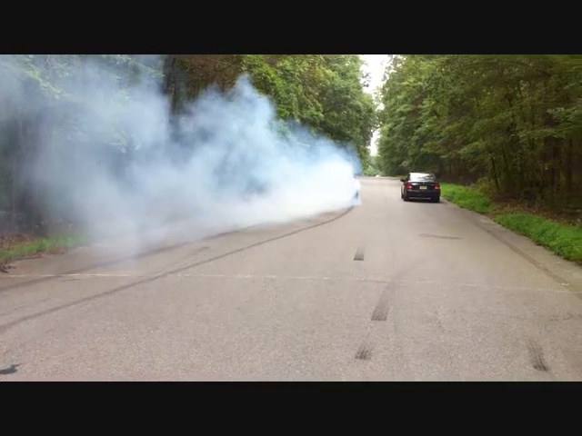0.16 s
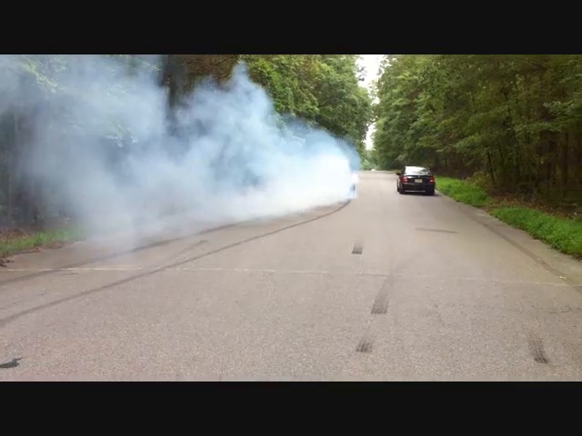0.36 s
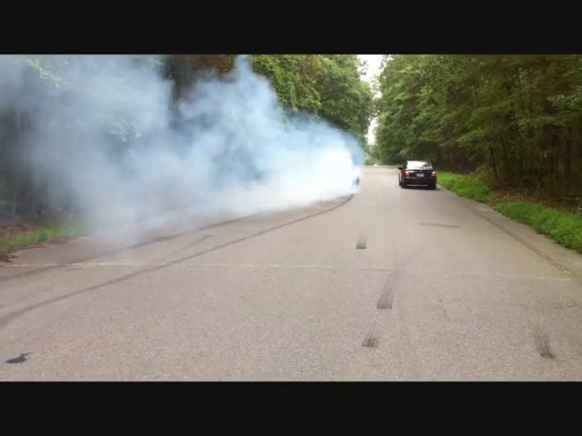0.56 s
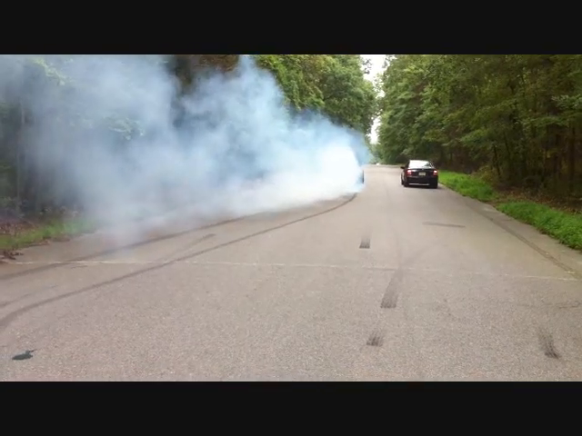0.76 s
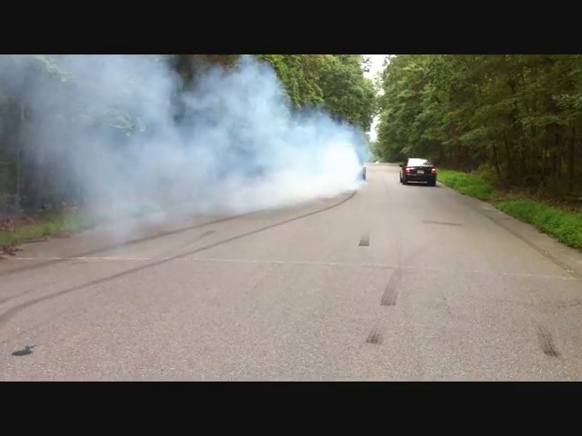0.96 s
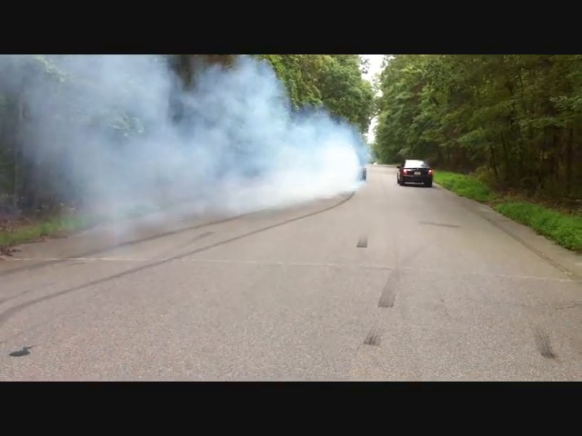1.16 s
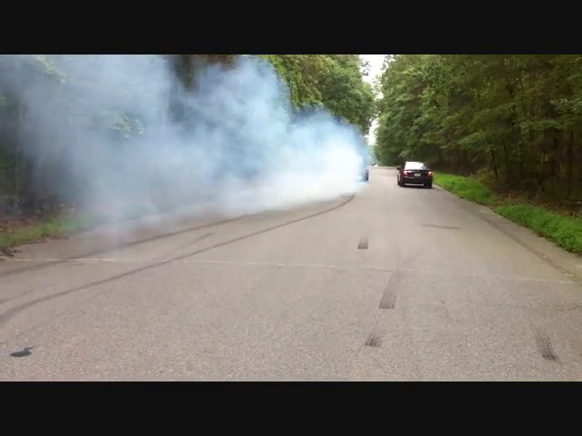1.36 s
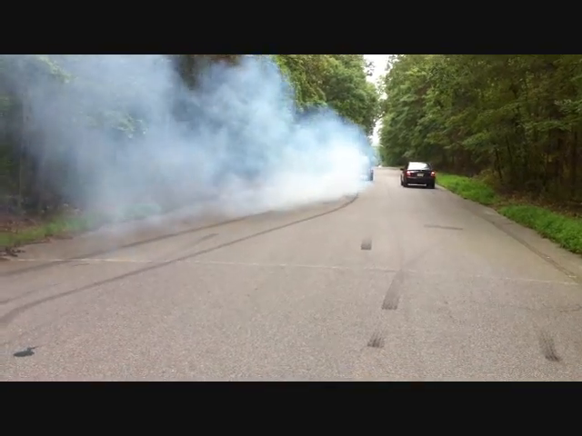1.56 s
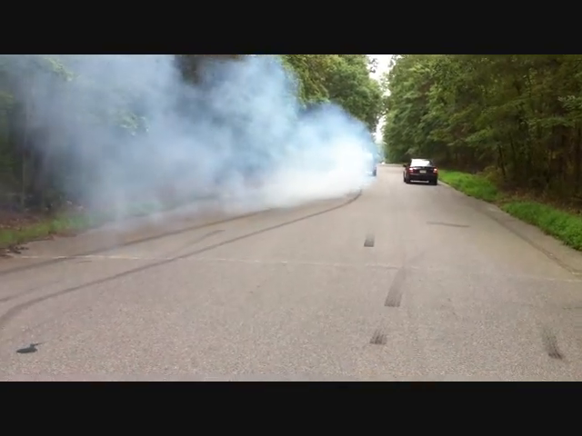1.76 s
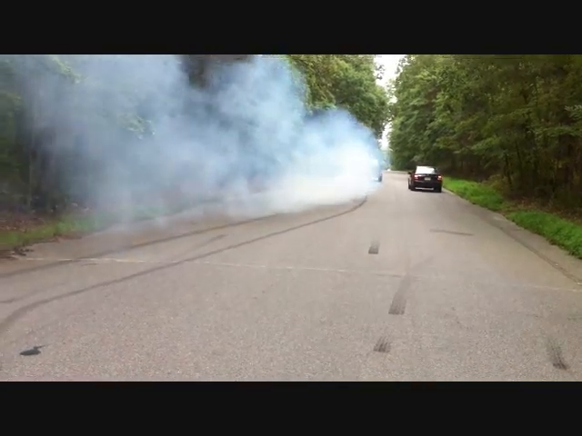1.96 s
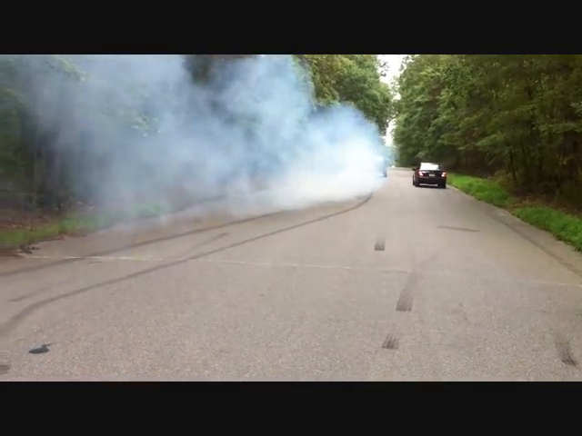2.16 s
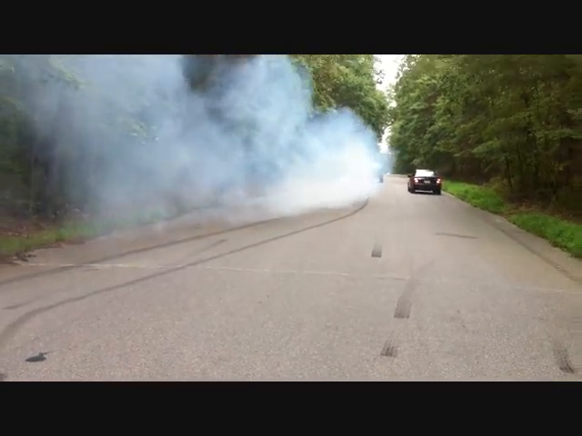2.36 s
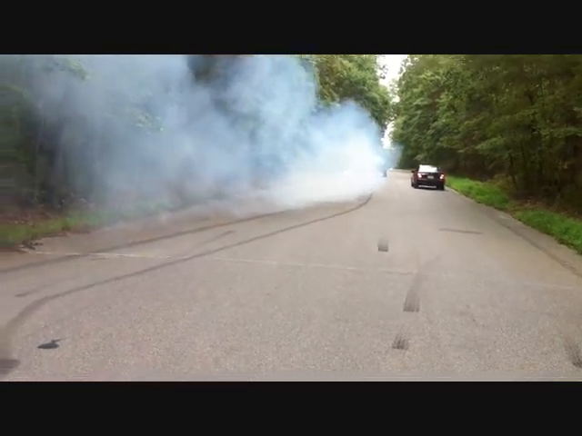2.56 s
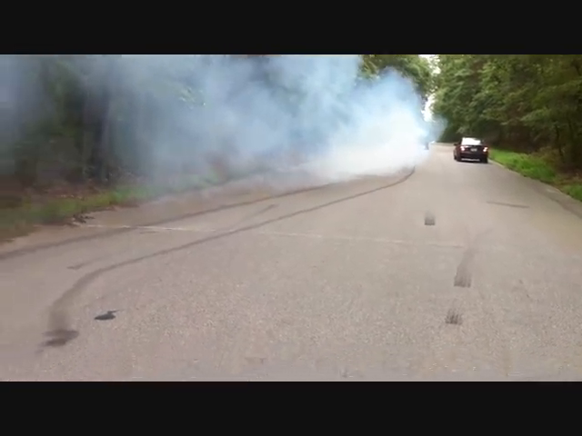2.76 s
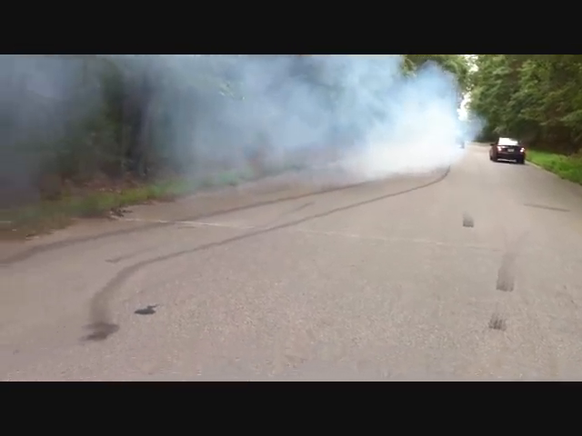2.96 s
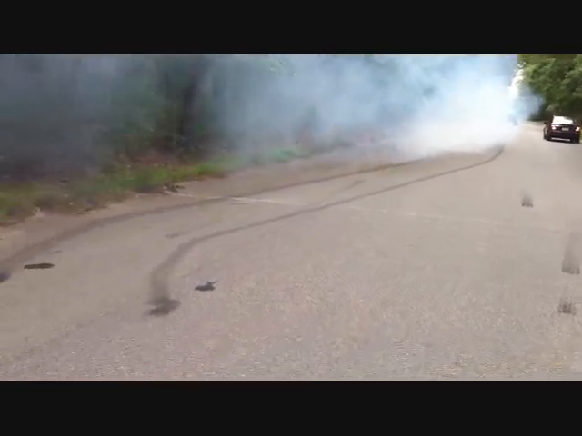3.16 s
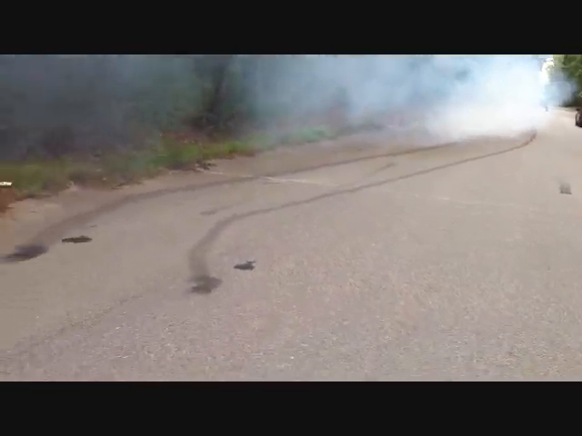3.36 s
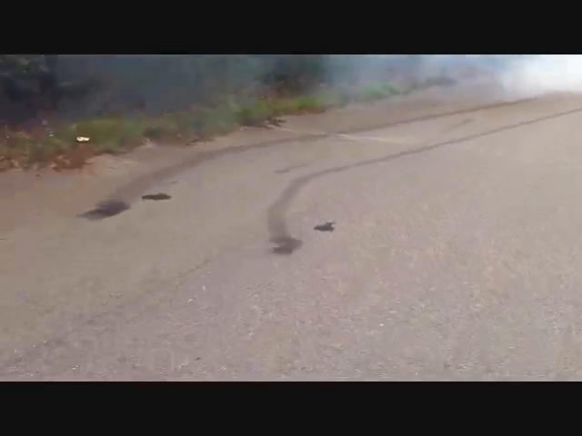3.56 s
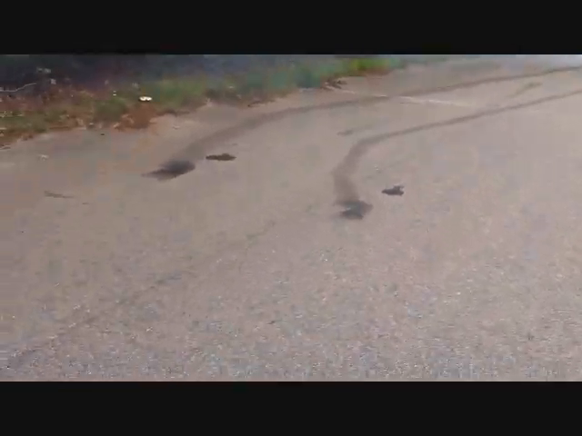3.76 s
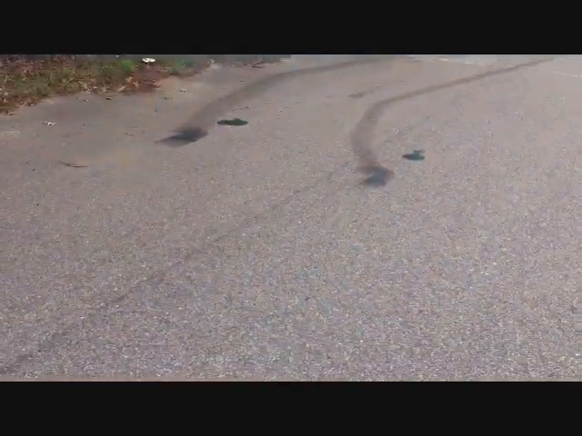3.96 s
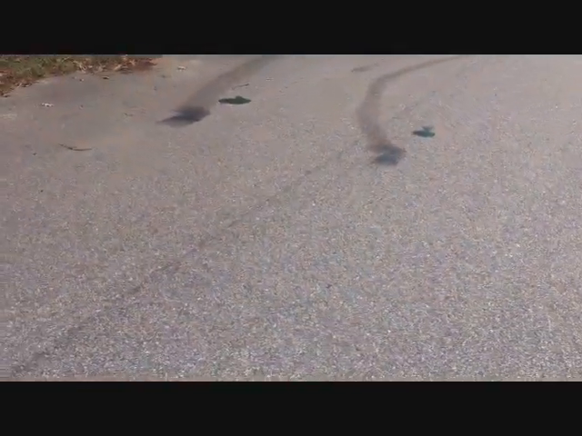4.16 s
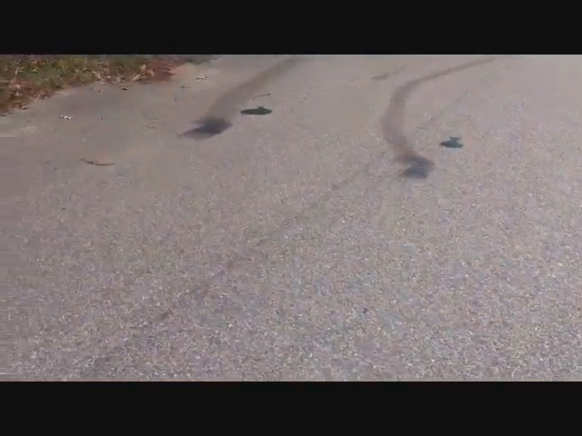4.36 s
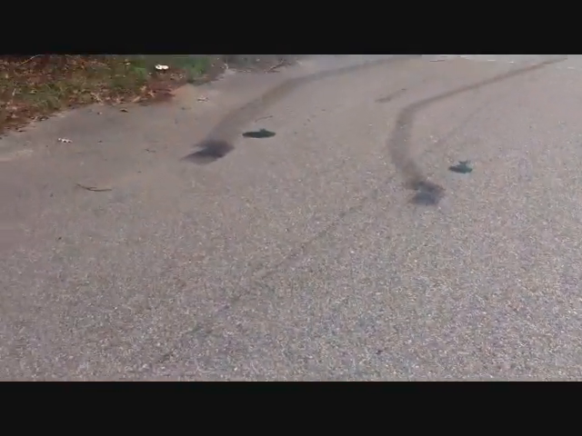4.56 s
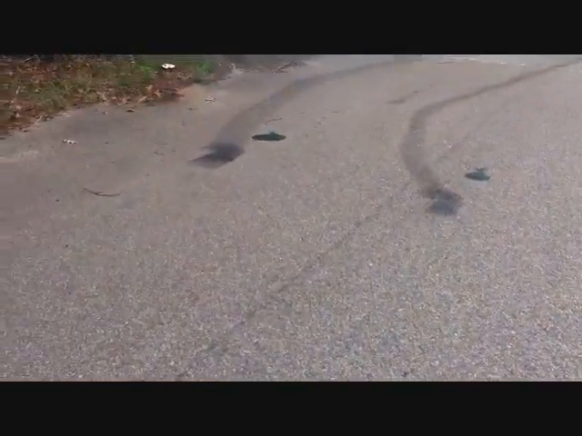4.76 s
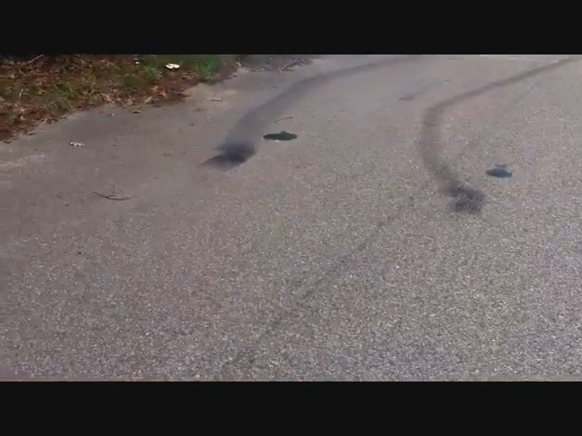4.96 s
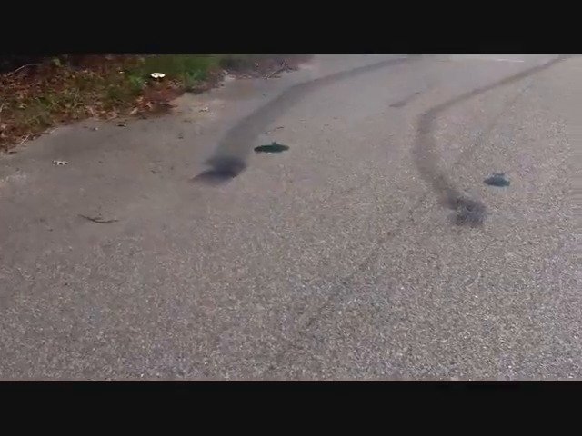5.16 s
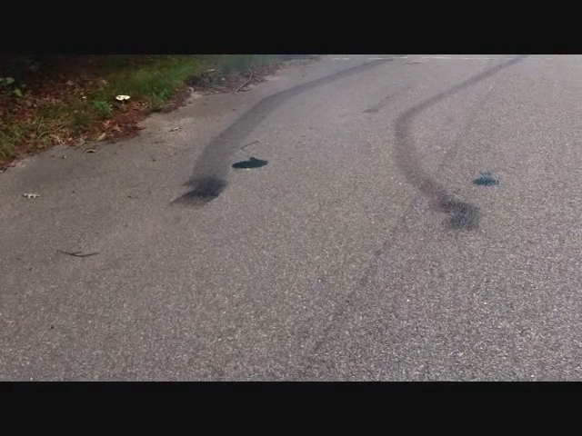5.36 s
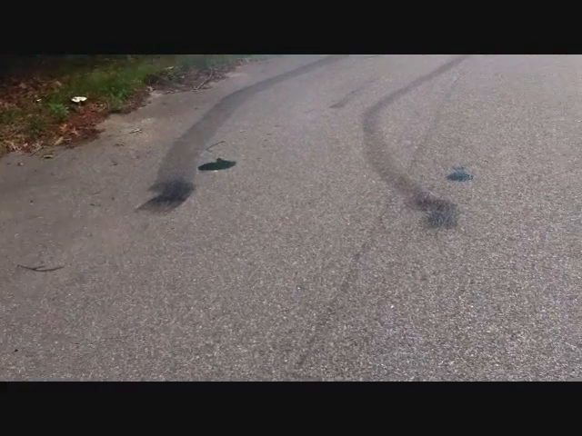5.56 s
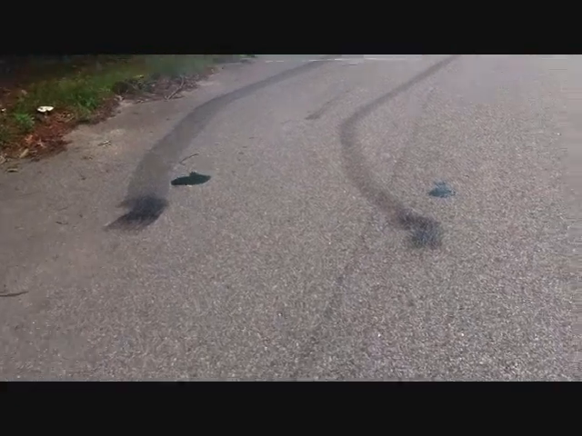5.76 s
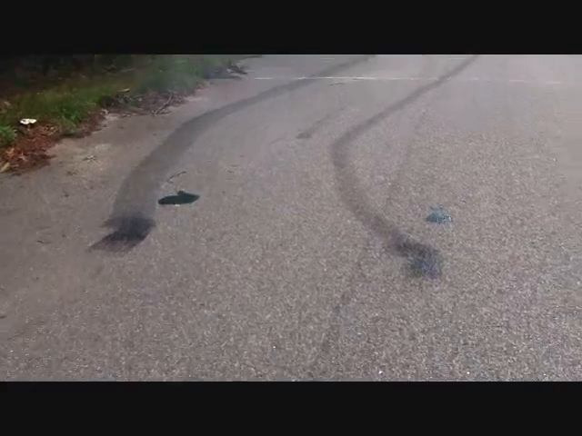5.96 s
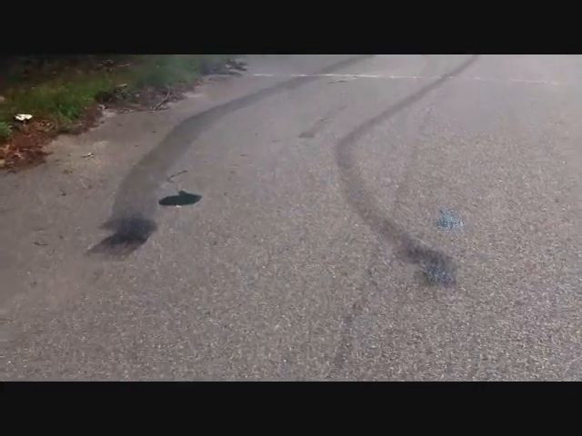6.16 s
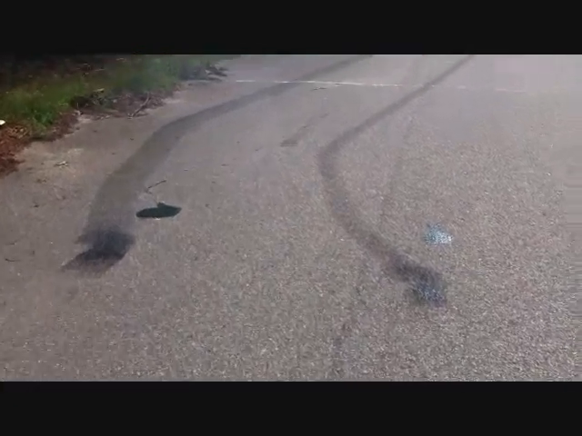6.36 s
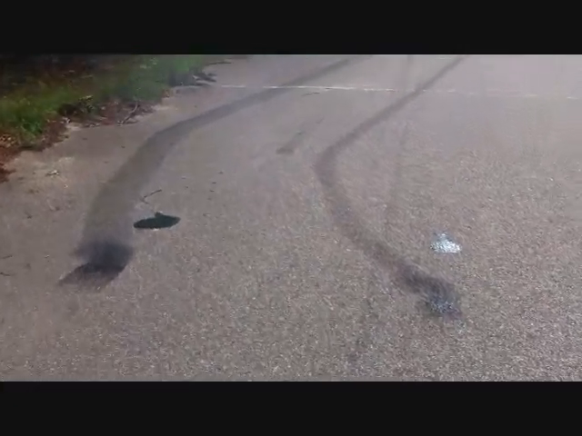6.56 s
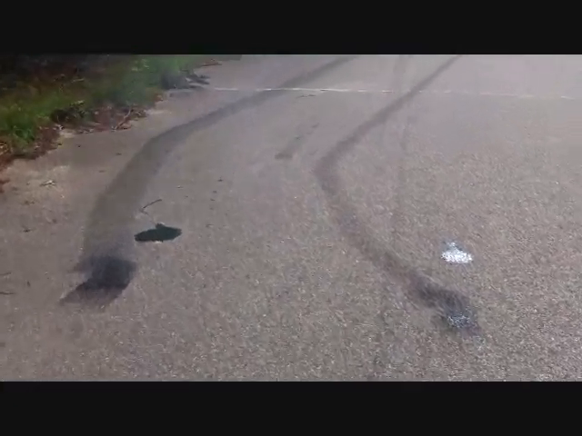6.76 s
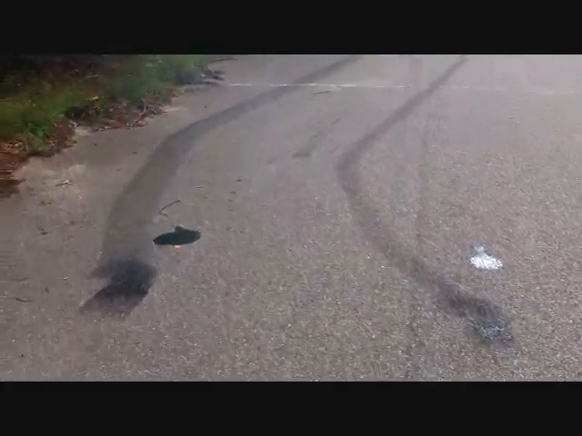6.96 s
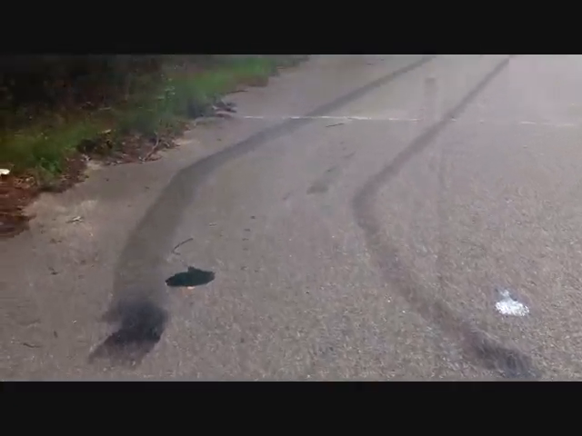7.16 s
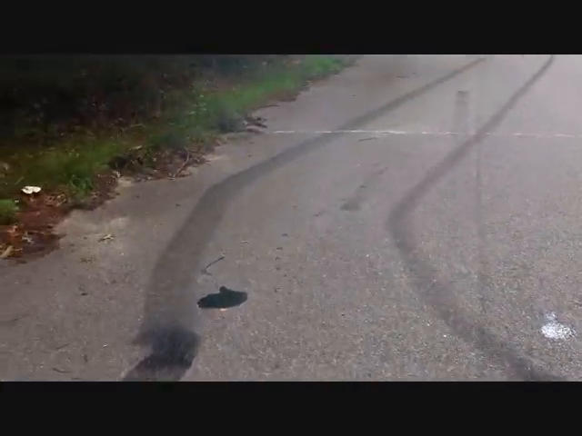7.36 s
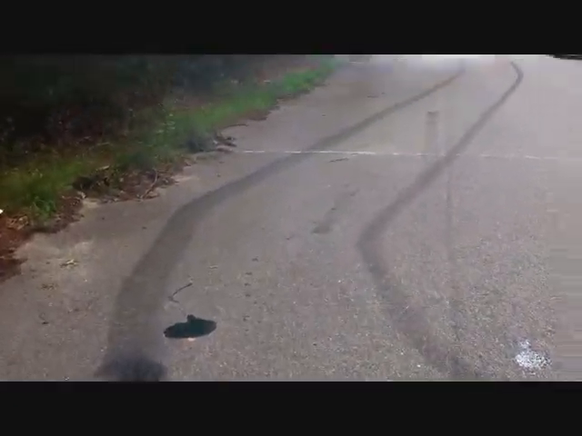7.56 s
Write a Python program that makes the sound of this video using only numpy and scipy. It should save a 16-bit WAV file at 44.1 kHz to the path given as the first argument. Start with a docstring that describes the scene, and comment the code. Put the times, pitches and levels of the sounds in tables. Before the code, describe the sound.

From the start, a car engine drones loudly at high revs while spinning tyres squeal in ragged bursts and hiss against the asphalt. The trees along the road add a short, dull echo. The squeal weakens and dies away soon after 1 second. The engine sags in pitch until about 1.8 seconds, then climbs a little as the hiss fades. Near 2.5 seconds the exhaust cracks, the throttle shuts at 2.7, and a quick cluster of coughs and thumps follows around 3 seconds. The engine booms and falls steadily in pitch, settling by 5 seconds into a quiet, lumpy idle. From about 4 seconds, very faint thin bird whistles, a high insect trill and soft nearby rustles come through. The idle throbs on with a few tiny exhaust pops around 7 seconds, fading toward the end at about 7.7 seconds.

```python
"""A six-cylinder car ends a burnout down a wooded road. Its firings drone through the exhaust at high
revs while the spinning tyres stick and slip, squealing and scouring the asphalt. The throttle shuts;
the exhaust coughs and booms down through its resonances to a lumpy idle. Trees scatter the sound.
Insects, a thin-voiced bird and faint rustling come through as it quietens."""
import sys
import numpy as np
from scipy import signal
from scipy.fft import rfft, irfft
from scipy.io import wavfile
from scipy.ndimage import uniform_filter1d

SR = 44100
rng = np.random.default_rng(int(sys.argv[2]) if len(sys.argv) > 2 else 0)


def materialize(psi):
    """Save the field psi as 16-bit PCM at rate SR to the path in sys.argv[1].

    A 1-D psi becomes a single channel; in a 2-D psi each row is a channel.
    """
    bounded = np.clip(np.atleast_2d(psi).T, -1, 1)
    quanta = np.round(bounded * 32767).astype(np.int16)
    wavfile.write(sys.argv[1], SR, quanta)


N = 339570
T = np.arange(N) / SR

# Engine speed. Each row: time in seconds, firing rate in Hz.
FIRING_RATE = [(0, 246.3), (.8, 227.5), (1.76, 191.7), (2.05, 206), (2.6, 219.5), (2.74, 216.1),
               (2.81, 202.5), (2.93, 198.8), (3.0, 189.4), (3.28, 166.5), (3.72, 130.4), (3.85, 121.1),
               (4.25, 94.1), (4.9, 59.03), (5.15, 48.7), (5.45, 50.9), (5.78, 44.72), (6.15, 54.05),
               (6.62, 56.4), (6.88, 54.56), (7.15, 49.54), (7.4, 47.36), (7.7, 46.03)]
# Each entry: one cylinder's strength in dB, in firing order.
CYLINDER_DB = [-8.5, -4.5, -3.5, -4.5, -4, -10.5]
# Drone tones. Each row: multiple of crank rate, open-throttle gain in dB, shut-throttle gain in dB.
DRONE_ORDERS = [(3, -6.5, 2), (4, -10, -16), (4.5, -12, -8), (6, -10, -8.5), (8, -20.5, -15),
                (9, -11.5, -12.5), (12, -32, -23)]
# Pipe and silencer resonances. Each row: frequency in Hz, drone gain in dB.
EXHAUST_RESPONSE = [(80, -43), (105, -14), (120, -10), (132, -7.5), (150, 2), (172, 0), (192, 2.5),
                    (203, -3.5), (215, -7), (235, -16), (260, -9), (320, -30.5), (400, -10), (440, -16.5),
                    (490, -7.5), (580, 4.5), (620, -3), (680, 2.5), (750, -13)]
# Idle hum. Each row: multiple of firing rate, gain in dB.
HUM_ORDERS = [(2, -5), (3, 2), (4, .5), (5, 3), (6, 2.5), (7, -3), (8, -2), (9, -2), (10, -5), (11, -4)]
# Gas rasp envelope. Each row: time in seconds, level in dB.
GAS_LEVEL = [(0.0, -27.5), (0.36, -29.5), (0.8, -32.5), (1.52, -37.5), (2.44, -36.5), (2.55, -34),
             (2.64, -37), (3.15, -40), (4.5, -49), (4.95, -48), (5.15, -48.5), (6.05, -57), (7.66, -64.5),
             (7.7, -61)]
# Exhaust coughs. Each row: time in seconds, width in seconds, thump in dB, crack in dB,
# share of drone lost.
EXHAUST_COUGHS = [(2.549, 0.0034, -48, -23.5, 0), (2.56, 0.005, -53, -28, 0), (2.771, 0.0041, -48, -38, 0),
                  (2.81, 0.0073, -31, -30, 0), (2.943, 0.0098, -23, -28.5, 1),
                  (2.964, 0.0078, -31, -29, 0.5), (3.012, 0.03, -28.5, -39, 0.43),
                  (6.799, .003, -52, -46, 0), (7.198, 0.0049, -57, -45, 0), (7.241, .003, -54, -47, 0),
                  (7.319, 0.0025, -58, -43, 0), (7.574, .003, -48, -47, 0)]
# Tread vibrations. Each row: nominal pitch in Hz, scatter as a share of pitch, gain in dB.
TREAD_MODES = [(491.7, 0.0302, -17.5), (572.3, .035, -10), (662, 0.0448, -5), (763.4, .04, -5),
               (849, .036, -2), (1018, .05, 0.5), (1118, 0.0406, -20), (1248, .03, -19)]
# Tread bites. Each row: centre in seconds, half-width in seconds, nominal pitch in Hz, level in dB,
# relative overtone level in dB.
TREAD_BITES = [(0.019, 0.01, 940, -14.5, -11), (0.048, 0.0047, 964.4, -18, -18),
               (0.057, 0.0049, 921.5, -9, -9.5), (0.091, 0.0053, 976, -15.5, -16),
               (.113, 0.0042, 960.5, -17.5, -19), (0.163, 0.0089, 928.6, -13, -14.5),
               (0.197, 0.0047, 1076, -13.5, -24), (.209, 0.0052, 932.6, -20, -3),
               (0.246, 0.0052, 950.6, -11.5, -24), (.27, 0.0045, 944, -11.5, -11.5),
               (.315, 0.0055, 916, -10, -12), (0.346, 0.0084, 947, -11.5, -23),
               (.372, 0.0081, 930.6, -17, -16), (0.404, 0.0037, 894.2, -17, -20),
               (0.429, 0.0048, 1014, -17, -22), (.449, 0.0039, 934, -15, -22),
               (.476, 0.004, 898, -14.5, -14), (0.502, 0.0079, 915, -15.5, -12),
               (0.573, 0.016, 937, -16, -15), (0.622, .005, 875.6, -18, -10),
               (0.658, 0.012, 960.6, -16, -20), (0.706, 0.0048, 952, -21.5, -16.5),
               (0.73, 0.0043, 945, -22.5, -25), (0.769, 0.0058, 896, -17, -14), (0.81, .014, 955, -23, -10),
               (0.849, 0.0058, 943, -20, -18), (0.881, 0.0052, 897.6, -20.5, -27),
               (0.995, 0.0057, 921, -21.5, -20), (1.025, .006, 826, -21, -20.5),
               (1.105, 0.0081, 934, -24, -13)]
# Whistles. Each row: start in seconds, length in seconds, start pitch in Hz, end pitch in Hz, level in dB.
BIRD_NOTES = [(3.995, .055, 7040, 5650, -53), (4.035, .15, 5900, 5900, -62.5),
              (4.083, .045, 7550, 7300, -64), (4.125, .055, 7560, 7400, -58), (4.19, .08, 6800, 6760, -61),
              (5.478, .05, 6115, 5830, -58), (5.558, .067, 7520, 7280, -67), (5.64, .23, 6980, 6900, -69),
              (6.411, 0.1201, 7200, 6850, -68), (7.402, .028, 6450, 6120, -58),
              (7.416, 0.029, 5930, 5230, -60), (7.44, 0.072, 6230, 6160, -61),
              (7.668, 0.019, 5720, 5180, -61)]
# Swells of the lower insect. Each row: centre in seconds, half-width in seconds, level in dB.
RATTLE_SWELLS = [(3.3, 0.68, -64), (5.242, 0.24, -66), (6.3, 0.34, -72)]
# Nearby rustles. Each row: centre in seconds, half-width in seconds, rustle in dB, brush in dB.
RUSTLE_SWELLS = [(4.019, 0.38, -56.5, -65), (4.87, 0.0082, -70, -66), (4.9, .2, -66, -82),
                 (5.25, 0.22, -60, -79), (6.15, 0.29, -58, -63.5), (7.288, .015, -63, -64)]
# Spectra. Each row: frequency in Hz, relative level in dB.
PIPE_SPECTRUM = [(25, -76), (60, -31), (100, -13), (150, -4.5), (220, -1.5), (280, 0.5), (340, -1),
                 (400, -12.5), (520, -0.5), (590, -0.5), (700, -35), (900, -24.5), (2000, -43), (5000, -60),
                 (12000, -75)]
RUMBLE_SPECTRUM = [(25, -43), (60, -32), (90, -5.5), (140, 3.5), (180, 8.5), (240, 3), (400, -5.5),
                   (900, -35.5)]
RASP_SPECTRUM = [(200, -33), (420, -1.5), (750, 5), (900, -1), (1120, 6), (1280, 2), (1390, 1), (1520, 2.5),
                 (1850, .5), (2090, -6), (2250, -1.5), (2430, -1.5), (2620, -19), (2800, -15.5),
                 (4200, -14.5), (8000, -46)]
COAST_SPECTRUM = [(200, -11), (450, -1), (700, -1), (900, 9.5), (1080, 9), (1270, 3.5), (1500, 6.5),
                  (1800, -4), (2100, -1.5), (2350, -7.5), (2800, -10), (3400, -12), (4100, -15),
                  (4900, -25), (8000, -43)]
SCOUR_SPECTRUM = [(900, -12), (2300, 6.5), (3200, 1), (3700, 1.5), (4350, 4), (5100, 1.5), (6300, 4.5),
                  (7400, 1), (8700, 3), (9700, 0.5), (11300, -0.5), (12500, -4.5), (14000, -7.5),
                  (15500, -15)]
LEAF_SPECTRUM = [(900, -11), (2300, 9.5), (3200, 2), (3700, 1.5), (4200, 4.5), (4900, 0.5), (5600, 0.5),
                 (6300, 0.5), (7300, -0.5), (8700, 2), (11300, 0.5), (12500, -6), (14000, -4), (15500, -9)]
AIR_SPECTRUM = [(25, -18), (70, -16), (200, 21), (600, 25), (1500, 17.5), (3000, 11.5), (4800, 6.5),
                (6000, 7), (7300, -10), (9500, -6), (12000, -10), (15500, 0)]

THROTTLE_SHUT_S, IDLE_FADE_S = 2.7, 7.08
GRIP_END_S, SCREECH_END_S, SPIN_EASE_S, SPIN_END_S = 1.004, 1.05, 2.25, 2.69
FIRINGS_PER_TURN = 3


def engine():
    """Firings drone at speed and thud at idle; a gas puff follows each."""
    firing_hz, = curves(FIRING_RATE)
    cycle = np.cumsum(firing_hz * (1 + .002828 * walk(40))) / SR
    throttle = 1 - ramp(THROTTLE_SHUT_S, length_s=.085)
    idle = np.clip((62 - firing_hz) / 8, 0, 1)
    fade = undb(-14 * after(IDLE_FADE_S))
    puff = unit(.5 + np.exp(-(cycle % 1) / 1.16))

    def gain(open_db, shut_db, idle_db):
        return undb(shut_db + throttle * (open_db - shut_db) + idle * (idle_db - shut_db))

    rumble = gain(-46.5, -45.5, -51) * colour(noise() * puff, RUMBLE_SPECTRUM)
    thuds = gain(-59.5, -49.5, -49.5) * firing_thuds(firing_hz, cycle)
    wash = gain(-42, -53.5, -51) * colour(noise() * puff, PIPE_SPECTRUM)
    hum = fade * idle * idle_hum(cycle)
    gas = gas_flow(firing_hz, puff, bark_gain=gain(-3, 0, -1))
    tones = (1 - idle) * drone(firing_hz, cycle, throttle) + hum
    return tones + woods(fade * (rumble + thuds + wash) + gas, wet_db=-11.5)


def drone(firing_hz, cycle, throttle):
    """Orders of two unequal banks sweep the exhaust resonances and stumble at the big coughs."""
    pipe_hz, pipe_db = np.transpose(EXHAUST_RESPONSE)
    speed_db = -26 + 11 * np.log2(firing_hz / 205)
    # The growl dies as the melting tyres take less torque.
    tones = throttle * engine_tone(2 * cycle / FIRINGS_PER_TURN, -35.5 - 6.5 * T, rough=.08)
    for order, open_db, shut_db in DRONE_ORDERS:
        per_firing = order / FIRINGS_PER_TURN
        hz = per_firing * firing_hz
        resonance_db = np.interp(np.log(hz), np.log(pipe_hz), pipe_db)
        level_db = speed_db + resonance_db + shut_db + throttle * (open_db - shut_db)
        rough = np.minimum((hz / 1080) ** 2 + .18 * throttle, 1)  # ragged treble plus wheel judder
        tones += engine_tone(per_firing * cycle + rng.random(), level_db, rough)
    lost = sum(share * swell(at_s, width_s) for at_s, width_s, _, _, share in EXHAUST_COUGHS)
    return tones * (1 - np.clip(lost, 0, 1))


def engine_tone(cycle, rms_db, rough):
    """Engine-locked tone; the share `rough` flutters in level and phase."""
    flutter = (walk(70) + 1j * walk(70)) / np.sqrt(2)
    envelope = np.sqrt(1 - rough ** 2) + rough * flutter
    return undb(rms_db) * np.sqrt(2) * np.real(envelope * np.exp(2j * np.pi * cycle))


def firing_thuds(firing_hz, cycle):
    """One pulse down the pipe per firing; unequal cylinders, no two firings alike."""
    onsets = np.flatnonzero(np.diff(np.floor(cycle)) > 0)
    scatter_db = 2 * rng.standard_normal(4096)[:len(onsets)]
    pulses = np.zeros(N)
    pulses[onsets] = undb(np.resize(CYLINDER_DB, len(onsets)) + scatter_db)
    return steady(colour(pulses - firing_hz / SR, PIPE_SPECTRUM))


def idle_hum(cycle):
    """Firing harmonics build in the pipe, throbbing once per crank turn."""
    lope = 1 + .089 * np.sin(2 * np.pi * cycle / FIRINGS_PER_TURN)
    level_db = -45.8 + 1.8 * np.minimum(T - IDLE_FADE_S, 0)
    tones = sum(engine_tone(k * cycle + rng.random(), db, rough=.06 * k) for k, db in HUM_ORDERS)
    return undb(level_db) * steady(lope * colour(tones, PIPE_SPECTRUM))


def gas_flow(firing_hz, puff, bark_gain):
    """Puffs rasp at high revs and soften at low; the silencer's bark follows the flow and saturates."""
    flow_db, = curves(GAS_LEVEL)
    racing = np.clip((firing_hz - 140) / 70, 0, 1)
    silencer = unit(ring(ring(noise() * puff, 674, 104), 540, 216))
    bark = np.minimum(undb(flow_db) * bark_gain, undb(-39)) * silencer
    fast = np.sqrt(racing) * undb(2.5) * colour(noise() * puff, RASP_SPECTRUM)
    coasting = np.sqrt(1 - racing) * undb(2) * colour(noise() * puff, COAST_SPECTRUM)
    return bark + undb(flow_db + .99 * walk(90)) * (fast + coasting)


def coughs():
    """Uneven burning thumps and cracks in the exhaust, with one sharp tick."""
    thump_hz = 154.6 * (1 + .0568 * walk(60))
    thump = np.sqrt(2) * np.sin(2 * np.pi * np.cumsum(thump_hz) / SR)
    crack = colour(noise(), RASP_SPECTRUM)
    pops = np.zeros(N)
    for at_s, width_s, thump_db, crack_db, _ in EXHAUST_COUGHS:
        burst = ramp(at_s, length_s=.0004) * np.exp(-after(at_s) / width_s)
        pops += undb(thump_db) * swell(at_s, width_s) * thump + undb(crack_db) * burst * crack
    tick = undb(-44) * swell(2.942, .005) * noise_band(4550, width_hz=1170)
    return pops + tick


def tyres():
    """Squeal fades as the rubber heats, faster once it stops sticking; screech and scouring join it."""
    squeal_db = -16.5 - 7.5 * T - 18 * after(GRIP_END_S)
    tread = unit(sum(tread_block(*mode) for mode in TREAD_MODES))
    carcass = undb(-7.5) * noise_band(940, width_hz=350)  # rung by countless small slips
    squeal = undb(squeal_db) * steady(woods(tread + carcass, wet_db=-8), window_s=.085)
    return squeal + woods(screech(squeal_db), wet_db=-14.5) + scour()


def tread_block(nominal_hz, scatter, db):
    """One tread patch wavers in pitch and grip, sagging in pitch as the wheels slow."""
    hz = nominal_hz * (1.02 - .03 * T) * (1 + scatter * (walk(220) + .694 * walk(25)))
    grip_db = 3 * walk(110)
    return undb(db + grip_db) * stick_slip(hz, overtone_db=-21.5 + 2.6 * np.tanh(walk(80)))


def screech(squeal_db):
    """The loudest stick-slip tone flares, dips in pitch and rasps at each bite until the rubber melts."""
    nominal_hz, bite_overtone_db = curves([(at_s, hz, db) for at_s, _, hz, _, db in TREAD_BITES])
    held = undb(squeal_db - 4 + 2 * walk(70.3) - 30 * after(SCREECH_END_S))
    bites = sum(undb(db) * swell(at_s, width_s) for at_s, width_s, _, db, _ in TREAD_BITES)
    sliding = held / (held + bites + 1e-9)
    hz = nominal_hz * (1 + .035 * (sliding - .5) + .02 * walk(200))
    overtone_db = bite_overtone_db + sliding ** 2 * (-30 - bite_overtone_db)
    return np.hypot(held, bites) * stick_slip(hz, overtone_db)


def stick_slip(hz, overtone_db):
    """Rubber sticks and lets go: three harmonics of falling strength."""
    phase = 2 * np.pi * (np.cumsum(hz) / SR + rng.random())
    return np.sqrt(2) * sum(undb((k - 1) * overtone_db) * np.sin(k * phase) for k in (1, 2, 3))


def scour():
    """Rubber hisses on asphalt, fading with distance, then dropping as the wheels hook up."""
    hooked = ramp(SPIN_END_S, length_s=.1)
    level_db = -28.5 - 3.5 * T - 9 * after(SPIN_EASE_S) - 4.5 * hooked
    return undb(level_db + .5 * walk(60)) * colour(noise(), SCOUR_SPECTRUM)


def bird():
    """Thin whistles deep in the trees slide on to pitch; longer slides quaver more."""
    song, wobble = np.zeros(N), walk(600)
    for start_s, length_s, start_hz, end_hz, db in BIRD_NOTES:
        progress = np.linspace(0, 1, int(length_s * SR))
        slide_hz = end_hz + (start_hz - end_hz) * (1 - progress) ** 4
        quaver = .005 + .2 * abs(1 - end_hz / start_hz)
        hz = slide_hz * (1 + quaver * np.interp(start_s + progress * length_s, T, wobble))
        envelope = undb(db) * np.sqrt(2 * np.abs(np.sin(np.pi * progress)))
        note = envelope * np.sin(2 * np.pi * np.cumsum(hz) / SR)
        slot = song[int(start_s * SR):][:len(note)]
        slot += note[:len(slot)]
    return woods(song, wet_db=-4)


def insects():
    """A high trill, a ringing core in a wider rasp, over a lower rattle that swells."""
    core = undb(-68.5) * wing_rasp(8260, width_hz=420, flutter_hz=70)
    rasp = undb(-66) * wing_rasp(8260, width_hz=1300, flutter_hz=70)
    swells = sum(undb(db) * swell(at_s, width_s) for at_s, width_s, db in RATTLE_SWELLS)
    rattle = (undb(-68) + swells) * wing_rasp(6100, width_hz=1400, flutter_hz=360)
    return core + rasp + rattle


def wing_rasp(hz, width_hz, flutter_hz):
    """Rasping wings: a noise band that flutters in level."""
    return undb(2 * walk(flutter_hz)) * noise_band(hz, width_hz)


def air():
    """Faint, wavering hush of open air."""
    return undb(-57.5 + 2.4 * walk(14)) * colour(noise(), AIR_SPECTRUM)


def leaves():
    """Steady leaf hiss with brief rustling and brushing close by."""
    hiss = undb(-64) * colour(noise(), LEAF_SPECTRUM)
    rustle = colour(noise(), LEAF_SPECTRUM)
    brush = noise_band(12000, width_hz=6000)
    return hiss + sum(swell(at_s, width_s) * (undb(rustle_db) * rustle + undb(brush_db) * brush)
                      for at_s, width_s, rustle_db, brush_db in RUSTLE_SWELLS)


def woods(x, wet_db, t60_s=1):
    """Direct sound plus dense, dull scatter from the trunks."""
    t = T[:SR]
    tail = signal.lfilter(*signal.butter(1, 4000, fs=SR), rng.standard_normal(SR))
    tail *= undb(-60 * t / t60_s) * (t > .015)
    scatter = signal.fftconvolve(x, tail / np.linalg.norm(tail))[:N]
    wet = undb(wet_db)
    return (x + wet * scatter) / np.hypot(1, wet)


def colour(x, spectrum, size=8192):
    """Minimum-phase filter through (Hz, dB) points; output rms 1."""
    hz, db = np.transpose(spectrum)
    bin_hz = np.arange(size // 2 + 1) * SR / size
    log_gain = np.log(undb(np.interp(np.log(bin_hz + 1), np.log(hz), db)))
    cepstrum = irfft(log_gain)[:size // 2]
    cepstrum[1:] *= 2
    impulse = irfft(np.exp(rfft(cepstrum, size)))
    return unit(signal.fftconvolve(x, impulse)[:N])


def ring(x, hz, width_hz):
    """One resonance."""
    return signal.lfilter(*signal.iirpeak(hz, hz / width_hz, SR), x)


def noise_band(hz, width_hz):
    """Noise twice through one resonance; rms 1."""
    return unit(ring(ring(noise(), hz, width_hz), hz, width_hz))


def noise():
    """White noise."""
    return rng.standard_normal(N)


def walk(rate_hz):
    """Line through random points at rate_hz; rms 1."""
    return unit(np.interp(T * rate_hz, np.arange(8192), rng.standard_normal(8192)))


def curves(table):
    """Columns of a timed table, per sample."""
    times_s, *columns = np.transpose(table)
    return [np.interp(T, times_s, column) for column in columns]


def swell(centre_s, half_width_s):
    """Bell-shaped envelope."""
    return np.exp(-((T - centre_s) / half_width_s) ** 2)


def after(start_s):
    """Seconds since start_s; zero before."""
    return np.maximum(T - start_s, 0)


def ramp(start_s, length_s):
    """Linear rise from 0 to 1."""
    return np.minimum(after(start_s) / length_s, 1)


def steady(x, window_s=.25):
    """Hold the running rms at 1."""
    return x / np.sqrt(np.abs(uniform_filter1d(x ** 2, int(window_s * SR))) + 1e-12)


def unit(x):
    """Scale to rms 1."""
    return x / np.sqrt(np.mean(x ** 2))


def undb(db):
    """Decibels to gain."""
    return 10 ** (np.asarray(db) / 20)


def scene():
    """Car and woodland, mono."""
    return (engine() + coughs() + tyres() + bird() + air() + insects() + leaves())[None]


def record(dry):
    """A small microphone thins the deep bass; a steep low-pass cuts the top."""
    thin = signal.sosfilt(signal.butter(1, 55, "high", fs=SR, output="sos"), dry)
    return signal.sosfilt(signal.ellip(10, .2, 80, 15700, fs=SR, output="sos"), thin)


dry = scene()
out = record(dry)
materialize(out)
```